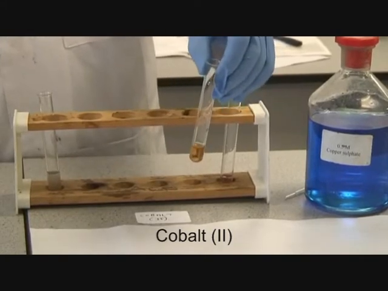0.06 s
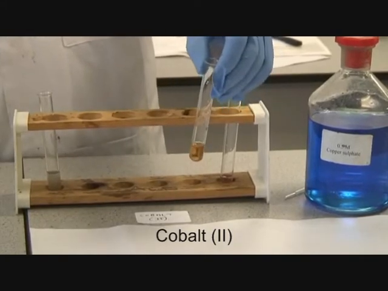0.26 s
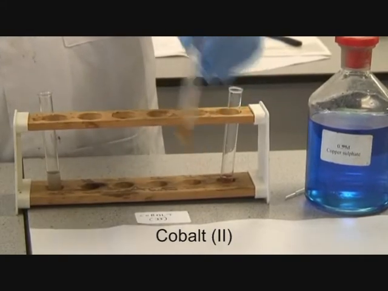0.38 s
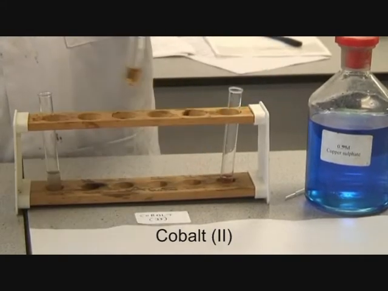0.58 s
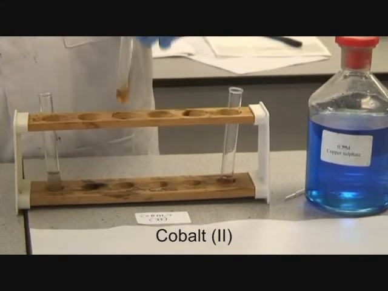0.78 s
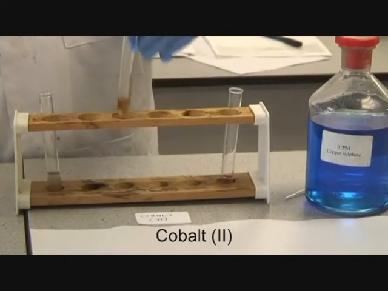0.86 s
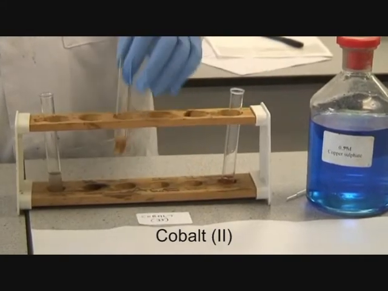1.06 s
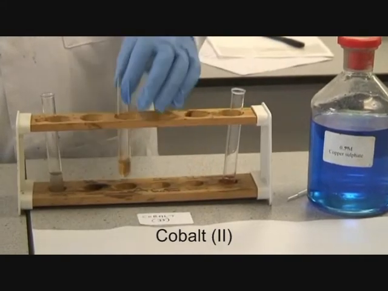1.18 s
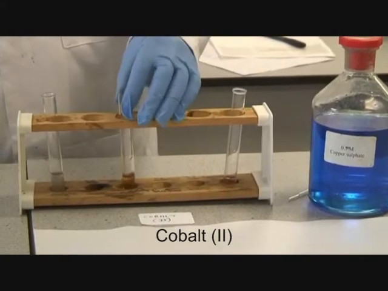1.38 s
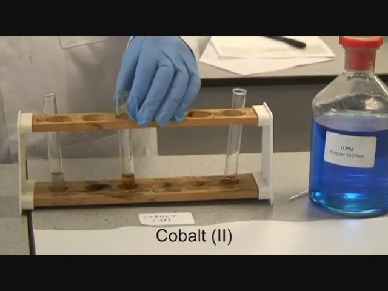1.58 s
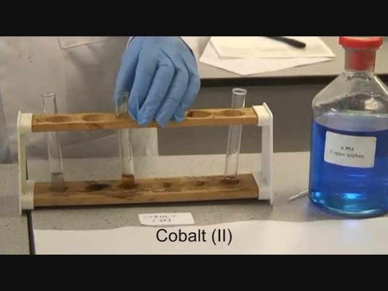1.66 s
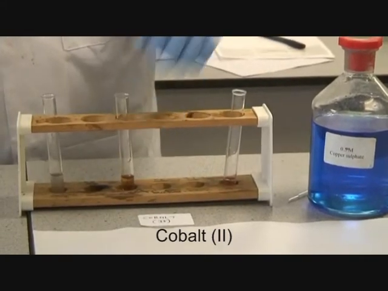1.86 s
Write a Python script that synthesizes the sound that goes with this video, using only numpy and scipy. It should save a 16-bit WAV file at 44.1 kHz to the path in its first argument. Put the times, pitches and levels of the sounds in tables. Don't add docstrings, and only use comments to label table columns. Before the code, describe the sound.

A glass test tube knocks against a wooden rack: faint grazes and light clinks at 0.05-0.1 s, a brighter clink with dull bumps at 0.17 s, then the loudest hard, rattling knock at 0.22 s, its hollow ring fading by about 0.6 s. A barely audible tick at 1.07, faint wooden bumps near 1.5, soft double settling at 1.7-1.8. Low ventilation, mains hum and slight hiss; short room reverberation, close microphone.

```python
import sys
import numpy as np
from scipy import signal
from scipy.io import wavfile
from scipy.ndimage import uniform_filter1d

SR = 44100
rng = np.random.default_rng(int(sys.argv[2]) if len(sys.argv) > 2 else 0)


def natural_amplitude(level_db):
    exponent = np.asarray(level_db, float) / 20
    return 10 ** exponent


def unload_audio(sound):
    columns = np.transpose(np.atleast_2d(sound))
    steps = np.round(np.clip(columns, -1, 1) * 32767)
    wavfile.write(sys.argv[1], SR, steps.astype(np.int16))


N = 83790


def evened(x):
    return x / np.sqrt(np.mean(x ** 2) + 1e-20)


def read(points, hz):
    f, value = np.transpose(points)
    return np.interp(np.log(hz + 1), np.log(f + 1), value)


def noise(spectrum, patch_db):
    real, imaginary, patches = rng.standard_normal((N // 512 + 5, 1025, 3)).T
    patches = uniform_filter1d(patches, size=12, axis=0)
    patches = evened(uniform_filter1d(patches, size=6, axis=1))
    hz = np.fft.rfftfreq(2048, 1 / SR)
    frames = (real + 1j * imaginary) * natural_amplitude(read(spectrum, hz)[:, None] + patch_db * patches)
    return evened(signal.istft(frames, nperseg=2048, noverlap=1536)[1][:N])


# f/Hz, level/dB per Hz
HISS_SPECTRUM = [(15, -16), (25, -1), (155, -2), (288, -9), (962, -13), (1290, -15.5), (4320, -13.5),
                 (15300, -17)]


def hiss():
    return natural_amplitude(-69) * noise(HISS_SPECTRUM, 0.96)


# f/Hz, level/dB per Hz
AIR_SPECTRUM = [(25, -8.5), (60, -14.5), (110, -9), (300, -3), (520, -12), (1300, -17.5), (2500, -24.5),
                (13000, -28)]


def ventilation():
    return natural_amplitude(-59.5) * noise(AIR_SPECTRUM, 1.34)


# f/Hz, rms level/dB
HUM_LINES = [(100, -78.5), (150.1, -62), (199.6, -73.5), (300, -73.5), (309, -74)]


def hum():
    t = np.arange(N) / SR
    waver_hz = np.geomspace(.5, 6, num=12)
    waver = evened(sum(np.sin(2 * np.pi * (f * t + rng.random())) for f in waver_hz))
    out = np.zeros(N)
    for hz, db in HUM_LINES:
        level = np.sqrt(2) * natural_amplitude(db - 1.35 * waver)
        out += level * np.sin(2 * np.pi * (hz * t + rng.random()))
    return out


# f/Hz, t60/s
ROOM_DECAY = [(250, 0.48), (700, 0.43), (1400, 0.34), (2800, 0.35), (5000, 0.4), (9000, 0.19)]


def room(x):
    level_db, build_s = -9.5, .012
    taps = np.zeros(SR)
    at = np.arange(100, SR - 20, 20)
    taps[at + rng.integers(0, 20, len(at))] = rng.choice([-1., 1.], len(at))
    hz, t, z = signal.stft(taps, SR, nperseg=256)
    decay = natural_amplitude(-60 * t / read(ROOM_DECAY, hz)[:, None])
    tail = signal.istft(z * decay, SR, nperseg=256)[1]
    tail = tail * (1 - np.exp(-(np.arange(len(tail)) / SR / build_s) ** 2))
    return natural_amplitude(level_db) * signal.fftconvolve(x, tail / np.linalg.norm(tail))[:N]


def strikes(contacts, modes, octaves, rise_s):
    out, t = np.zeros(N + SR), np.arange(SR // 2) / SR
    hz, db, t60 = np.transpose(modes)[:, :, None]
    sign = (-1.) ** np.arange(len(modes))[:, None]
    for s, level_db, favoured_hz in contacts:
        at = int(s * SR)
        u = np.maximum(t - (s - at / SR), 0)
        off_pitch_db = 11.2 * (np.log2(hz / favoured_hz) / octaves) ** 2
        weight = sign * natural_amplitude(level_db + db - off_pitch_db - 60 * u / t60)
        ring = (weight * np.sin(2 * np.pi * hz * u)).sum(0)
        out[at:at + len(t)] += ring * (1 - np.exp(-(u / rise_s) ** 2))
    return out[:N]


# t/s, level/dB, favoured f/Hz
SETTLE_TOUCHES = [
    (1.7040, -51.5, 1300),
    (1.711, -51, 650),
    (1.779, -56.5, 1190),
    (1.787, -60, 680),
]
# f/Hz, level/dB, t60/s
SEAT_MODES = [(525, 6.5, 0.055), (639, 0, 0.1), (864, 9.5, 0.022), (1300, 1.5, 0.028), (1545, -5, 0.083),
              (1800, -11, 0.036), (2064, 0.5, 0.072), (3500, -10, .015)]


def settles():
    return strikes(SETTLE_TOUCHES, SEAT_MODES, 0.97, 0.00074)


# start t/s, length/s, f/Hz, level/dB
TUBE_TONES = [
    (0.048, 0.015, 1200, -56.5),
    (0.334, 0.01, 1008, -37.5),
    (0.376, 0.032, 910, -51.5),
    (1.707, 0.038, 1061, -51),
    (1.718, 0.041, 1985, -65),
    (1.784, 0.026, 1050, -58),
]


def sings():
    edge_s = 0.002
    t, out = np.arange(N) / SR, np.zeros(N)
    for s, length, hz, db in TUBE_TONES:
        gate = np.clip(np.minimum(t - s, s + length - t) / edge_s, 0, 1)
        fade_db = -1.5 * np.clip((t - s) / length, 0, 1)
        out += gate * natural_amplitude(db + fade_db) * np.sin(2 * np.pi * hz * t)
    return out


# t/s, level/dB, low f/Hz, high f/Hz, t60/s
GRIT = [
    (0.092, -62, 1500, 8900, 0.052),
    (.162, -60, 600, 2500, 0.45),
    (.165, -57, 3500, 6700, 0.053),
    (.1745, -61, 3430, 4900, 0.25),
    (.176, -62, 9000, 12200, 0.18),
    (0.2099, -48, 1010, 2170, 0.068),
    (.2205, -38.5, 2750, 4440, 0.049),
    (.2212, -71, 4750, 6800, 0.018),
    (1.7035, -59.5, 1500, 5000, 0.063),
]


def cracks():
    rise_s = .002
    out, t = np.zeros(N + SR), np.arange(SR // 5) / SR
    rise = 1 - np.exp(-(t / rise_s) ** 2)
    grains = rng.standard_normal((len(GRIT), len(t)))
    for (s, db, lo_hz, hi_hz, t60), grain in zip(GRIT, grains):
        sos = signal.butter(N=2, Wn=[lo_hz, hi_hz], btype="band", fs=SR, output="sos")
        at = int(s * SR)
        out[at:at + len(t)] += evened(signal.sosfilt(sos, grain)) * natural_amplitude(db - 60 * t / t60) * rise
    return out[:N]


# t/s, level/dB, favoured f/Hz
GLASS_TOUCHES = [
    (.045, -59, 4000),
    (.060, -51.5, 6000),
    (.068, -57.5, 3800),
    (.094, -97, 5970),
    (.166, -75, 4200),
    (.1745, -37.5, 5240),
    (.180, -63, 4200),
    (.1865, -57, 10100),
    (.197, -66, 4500),
    (1.07, -61, 4500),
]
# f/Hz, level/dB, t60/s
GLASS_MODES = [(2600, 4, 0.032), (3500, -3, .015), (3900, -2, 0.015), (4150, -21, .07), (4425, -6.5, 0.037),
               (4650, -34, 0.011), (4900, -5, 0.0056), (6236, -6.5, 0.028), (6860, -23, .015),
               (9500, 1, .012)]


def clinks():
    chatter_s, touches_per_s = 0.0059, 1500
    t = np.arange(SR // 20) / SR
    touching = rng.random(len(t)) < touches_per_s / SR
    chatter = rng.standard_normal(len(t)) * touching * np.exp(-t / chatter_s)
    chatter[0] = 1
    rings = strikes(GLASS_TOUCHES, GLASS_MODES, 0.6, 0.00016)
    return signal.oaconvolve(rings, chatter / np.linalg.norm(chatter))[:N]


# t/s, level/dB, favoured f/Hz
WOOD_BUMPS = [(.0945, -39.5, 853), (.102, -45, 630), (.165, -44, 670), (.169, -39, 636), (.1752, -36, 840),
              (.180, -43.5, 655), (.187, -49, 800), (.192, -42.5, 756), (.2075, -43, 735),
              (.2108, -27.5, 750), (.2142, -29, 800), (.2175, -51, 950), (1.478, -49, 740),
              (1.488, -51, 483), (1.508, -57, 1240)]
# f/Hz, level/dB, t60/s
WOOD_MODES = [(456, 4, 0.044), (650.5, 1, 0.037), (790, -2, 0.017), (937, 3, 0.014), (1240, -5, 0.028),
              (1700, -9, .015)]


def bumps():
    return strikes(WOOD_BUMPS, WOOD_MODES, 0.67, 0.0004)


# f/Hz, level/dB, t60/s
SHELF_MODES = [(209, -5.5, 0.15), (357, -28, 0.44), (578.5, -9, 0.55), (923, -4.5, 0.5), (985, -1, 0.35),
               (1400, -13, .18)]


def shelf():
    start_s, level_db, rise_s, blur_s = .222, -33, 0.025, 0.016
    t = np.maximum(np.arange(N) / SR - start_s, 0)
    r = np.exp(-1 / (blur_s * SR))
    wobble = rng.standard_normal((2, len(SHELF_MODES), SR))
    wobble = evened(signal.lfilter([1], [1, -2 * r, r * r], wobble))
    wobble = np.pad(wobble, ((0, 0), (0, 0), (0, N - SR)))
    ring = np.zeros(N)
    for (hz, db, t60), a, b in zip(SHELF_MODES, *wobble):
        phase = 2 * np.pi * hz * t
        ring += natural_amplitude(db - 60 * t / t60) * (a * np.sin(phase) + b * np.cos(phase)) / np.sqrt(2)
    return natural_amplitude(level_db) * ring * (1 - np.exp(-(t / rise_s) ** 2))


# t/s, level/dB, favoured f/Hz
RACK_BLOWS = [
    (.2211, -24, 1490),
    (.2233, -22.5, 1050),
    (.2260, -26, 2570),
    (.2286, -23.5, 2050),
    (.2306, -27, 1800),
    (.2331, -43, 1800),
    (.2365, -34.5, 990),
    (.2535, -46, 1120),
    (.257, -63, 1090),
]
# f/Hz, level/dB, t60/s
RACK_MODES = [(343, -2.5, 0.066), (479, -3.5, 0.12), (651, -3, 0.061), (800, -5, 0.032), (994, 3.5, 0.034),
              (1140, 9, 0.0067), (1372, 2, 0.026), (1644, 7.5, 0.013), (1800, 7.5, 0.0063),
              (2010, -5, 0.029), (2134, 1, 0.013), (2463, -6, 0.023), (2776, -2, 0.0072), (4893, -47, 0.37)]


def blows():
    return strikes(RACK_BLOWS, RACK_MODES, 2.32, .0004)


def scene():
    hits = settles() + cracks() + clinks() + bumps() + blows()
    body = signal.butter(N=3, Wn=260, btype="high", fs=SR, output="sos")
    hits = signal.sosfilt(body, hits)
    mid = ventilation() + hum() + room(hits) + sings() + shelf() + hits
    side = hiss()
    return np.array([mid + side, mid - side])


def top_cut(x):
    return signal.sosfilt(signal.butter(12, 15420, fs=SR, output="sos"), x)


def record(dry):
    edge = signal.firwin(255, 15400, window=("kaiser", 9), fs=SR)
    mix = signal.oaconvolve(dry, edge[None], "same")
    return top_cut(mix)


dry = scene()
out = record(dry)
unload_audio(out)
```